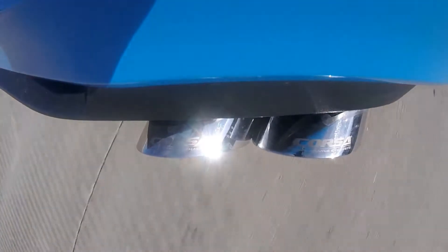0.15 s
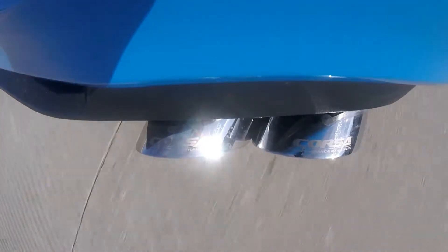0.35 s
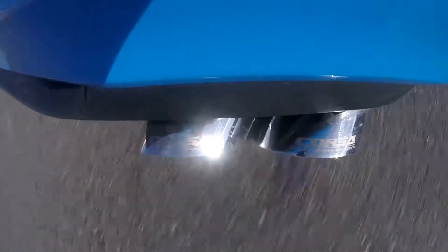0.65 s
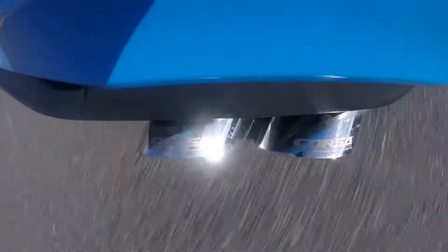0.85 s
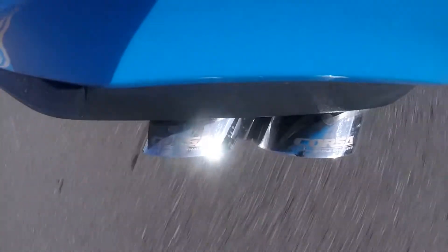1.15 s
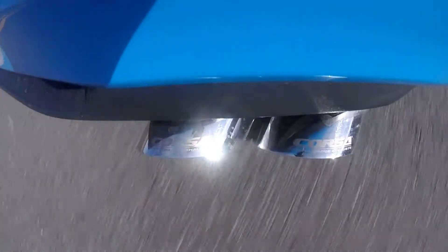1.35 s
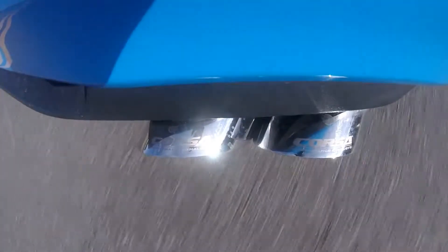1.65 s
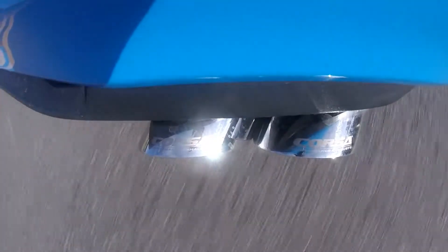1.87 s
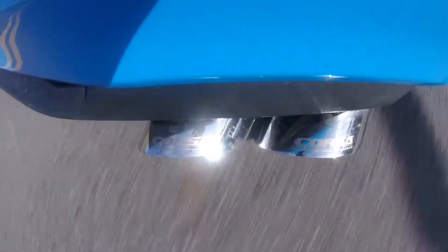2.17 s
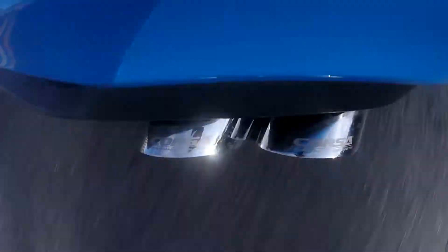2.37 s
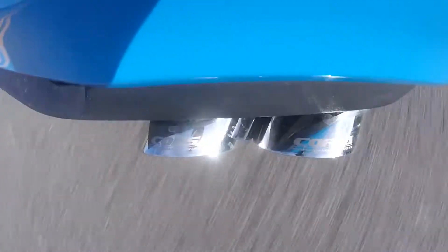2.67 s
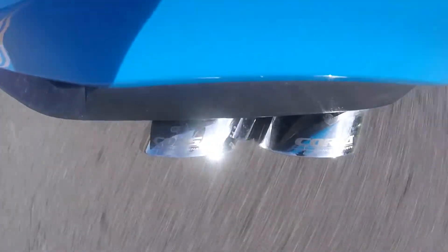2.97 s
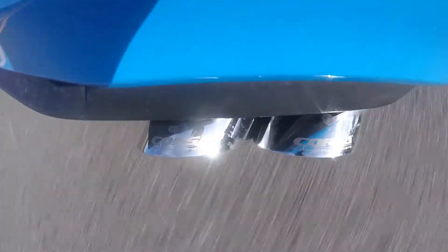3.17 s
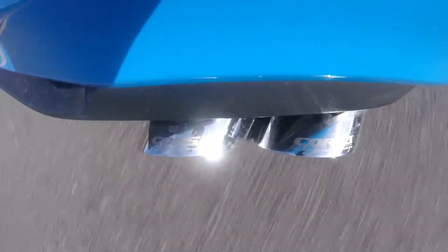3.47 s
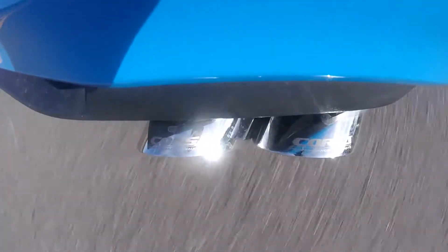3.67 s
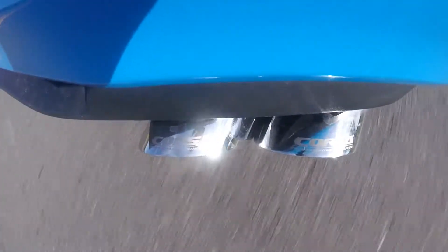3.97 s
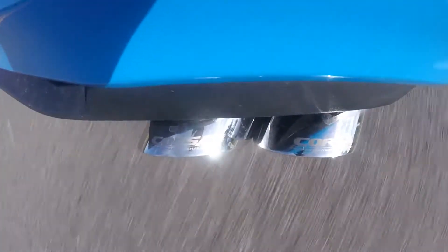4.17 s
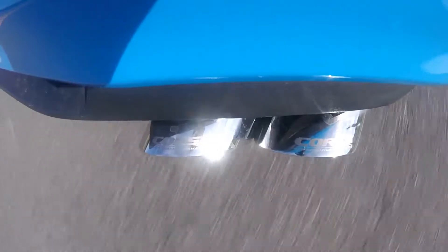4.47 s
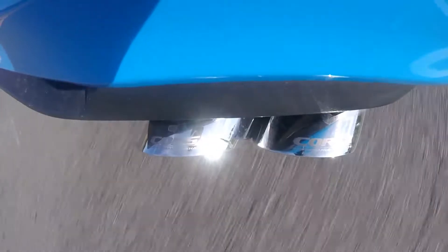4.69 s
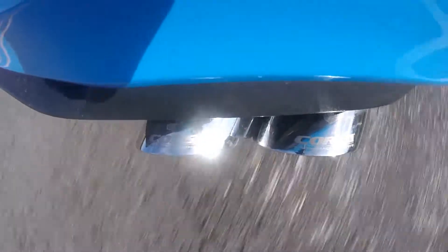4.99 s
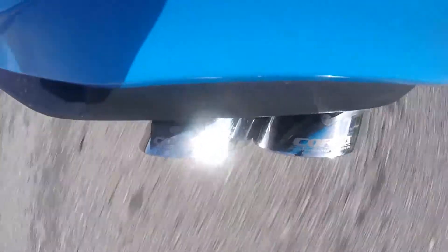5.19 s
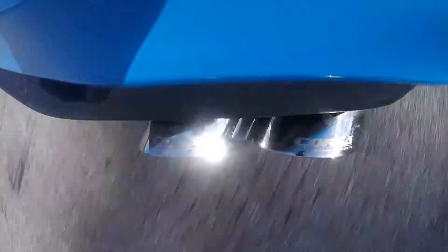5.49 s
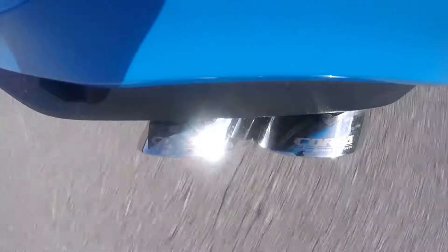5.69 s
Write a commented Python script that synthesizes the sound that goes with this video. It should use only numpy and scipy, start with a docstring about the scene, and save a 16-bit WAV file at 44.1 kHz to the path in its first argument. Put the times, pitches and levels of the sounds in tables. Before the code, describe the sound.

From a microphone on the rear bumper of a moving car, a loud V8 roars at full throttle, then drops in pitch with a barking gear change. The exhaust burbles and pops as the car coasts and picks up again, before settling into a deep, slowly falling drone that ends in a putter. Gusts of wind and softer tyre noise run throughout, with a few faint ticks of grit.

```python
"""A cross-plane V8 heard from just above its tailpipes, where eight uneven puffs a cycle boom and rasp.
It starts at full throttle; near 0.9 s the pedal lifts for an upshift, and the next gear bites with a
shudder. A short flare at 1.7 s gives way to coasting, then to a lumpy pick-up at 2.6 s; through these,
unburnt fuel pops in the pipes. From 3.3 s a steady drone sinks with the revs, easing to a putter at 5 s.
All along, wind buffets the microphone and the tyres rush on the road, now and then throwing up grit."""
import sys
import numpy as np
from scipy import signal
from scipy.fft import rfft, irfft, next_fast_len
from scipy.io import wavfile
from scipy.ndimage import uniform_filter1d, minimum_filter1d, map_coordinates

SR = 44100
rng = np.random.default_rng(int(sys.argv[2]) if len(sys.argv) > 2 else 0)


def to_wav(s):
    """Save 16-bit WAV."""
    ch = np.atleast_2d(s).T  # columns
    pcm = np.round(np.clip(ch, -1, 1) * 32767)  # PCM
    wavfile.write(sys.argv[1], SR, pcm.astype(np.int16))


N = 257544
TIME = np.arange(N) / SR

# rate of the engine cycle, two crank turns and eight firings: (time [s], cycle rate [Hz])
CYCLE_RATE = [(0.0, 36.25), (0.2, 36.72), (0.8, 39.34), (1.12, 36.27), (1.32, 34.31), (1.45, 30.71),
              (2.45, 30.15), (2.7, 29.68), (3.05, 29.54), (3.55, 28.9), (4.8, 26.57), (5.08, 25.68),
              (5.2, 26.04), (5.3, 25.51), (5.84, 25.08)]
# the eight puffs of a cycle as they leave the pipes: (place [eighths of a cycle], size [0-1])
PUFFS_HARD = [(.68, .9), (1.83, .65), (2.72, .9), (3.76, 1), (4.85, .6), (5.85, .35), (6.87, 1), (7.78, .6)]
PUFFS_LIGHT = [(.75, 0.64), (1.78, .55), (2.72, .55), (3.74, 1), (4.75, 1), (5.78, 1), (6.85, 0.44),
               (7.9, 0.93)]
PUFFS_COAST = [(1.05, .55), (1.98, .6), (2.4, .45), (3, .6), (3.85, .65), (4.8, .5), (6.1, .8), (7.4, .5)]
PUFFS_EASE = [(.1, .45), (1.45, .95), (2.45, .2), (3.1, .2), (4.3, .35), (5.5, 1), (6.8, .4), (7.05, .45)]
PUFFS_CRUISE = [(.3, .8), (1.57, .95), (2.65, .5), (3.25, .5), (4.58, .6), (5.65, .95), (6.98, .85),
                (7.3, .55)]
# harmonic spectra of the exhaust: (order [multiple of the cycle rate], relative level [dB])
THROTTLE = [(1, -40), (2, -12), (3, -21), (4, -11.5), (5, -5.5), (6, -13), (7, -10), (8, 0.5), (9, -6),
            (10, -7.5), (11, -22.5), (12, -8.5), (13, -8.5), (14, -14.5), (15, -3), (16, 1.5), (17, -3),
            (18, -2.5), (19, 1.5), (20, -6.5), (21, -1), (22, -19), (23, -3), (24, -13), (25, -11),
            (26, -25.5), (27, -39.5), (28, -11.5)]
FLARE = [(1, -28), (2, -27.5), (3, -31), (4, -39), (5, -6), (6, -8.0), (7, -1), (8, 4), (9, -18), (10, -23),
         (11, -22.5), (12, -17), (13, -20.5), (14, -9.5), (15, -9.5), (16, -5), (17, -29), (18, -13),
         (19, -13), (20, -6.5), (21, -9), (22, -10), (23, -8.5), (24, -2), (25, -33), (26, -17), (27, -29),
         (28, -37), (29, -33), (30, -22.5)]
BURBLE = [(1, -9.5), (2, -16), (3, -8), (4, -14.5), (5, -2), (6, 4.5), (7, -2.5), (8, -0.5), (9, -3),
          (10, -10), (11, -11.5), (12, -10.5), (13, -11), (14, -11.0), (15, -11), (16, -19), (17, -5.5),
          (18, -1), (19, -10), (20, -3.5), (21, -5.5), (22, -18), (23, -16), (24, -11.5), (25, -17.5),
          (26, -23), (27, -24.5), (28, -19.5), (29, -28), (30, -31)]
COAST = [(1, -5.5), (2, -10), (3, -10.5), (4, -23.5), (5, -8), (6, 1), (7, -1), (8, 2), (9, -12.5),
         (10, -7.5), (11, -3), (12, -11), (13, -5.5), (14, -27), (15, -5.5), (16, -15.5), (17, -11.5),
         (18, -12), (19, -9), (20, -8), (21, -11), (22, -6.5), (23, -7), (24, -19.5), (25, -22),
         (26, -24.5), (27, -31), (28, -17), (29, -29.5), (30, -17)]
DRONE = [(1, -38.5), (2, -26), (3, -11), (4, -22), (5, -16.5), (6, 2), (7, -3.5), (8, -1), (9, -16.5),
         (10, -8.5), (11, -14), (12, -19.5), (13, -11), (14, -14.5), (15, -18), (16, -19.5), (17, -26),
         (18, -13), (19, -7.5), (20, -15.5), (21, -13), (22, -22.5), (23, -29), (24, -9.5), (25, -9),
         (26, -8), (27, -40.5), (28, -33.5), (29, -25.5), (30, -23), (31, -18.5), (32, -35), (33, -31.5),
         (34, -21.5), (35, -27), (36, -40), (37, -36.5), (38, -32.5)]
EASE = [(1, -24), (2, -10), (3, -33.5), (4, -15.5), (5, -32), (6, 3), (7, -5), (8, 0), (9, -8.5),
        (10, -4.5), (11, -19.5), (12, -9), (13, -11), (14, -10.5), (15, -25), (16, -10.5), (17, -16),
        (18, -13), (19, -20.5), (20, -9.5), (21, -22), (22, -15.5), (23, -9), (24, -9.5), (25, -9),
        (26, -28), (27, -10.5), (28, -15), (29, -18.5), (30, -15.5), (31, -19.5), (32, -20), (33, -26),
        (34, -25), (35, -36), (36, -35), (37, -24.5), (38, -25.5), (39, -19), (40, -29.5)]
# running states: full throttle, lift, overrun, fuel back, flare, coasting, pick-up, drone, putter
# (start [s], crossfade [s], spectrum [table], puffs [table], boom [dB], bark [dB], rasp [dB],
# roughness [0-1])
STATES = [(-1, .1, THROTTLE, PUFFS_HARD, -20.1, -19.2, -24.7, .06),
          (.88, .13, THROTTLE, PUFFS_HARD, -19.8, -23.3, -32.5, .12),
          (.93, .03, BURBLE, PUFFS_LIGHT, -27, -31, -53, .38),
          (1.56, .06, BURBLE, PUFFS_LIGHT, -15.3, -22.8, -35.2, .42),
          (1.68, .1, FLARE, PUFFS_LIGHT, -18.6, -24, -36, .2),
          (1.95, .12, COAST, PUFFS_COAST, -22, -29.2, -55, .4),
          (2.58, .16, BURBLE, PUFFS_LIGHT, -16.4, -20.6, -36.6, .7),
          (3.25, .1, DRONE, PUFFS_CRUISE, -14.7, -23.5, -40.5, .15),
          (5.04, .27, EASE, PUFFS_EASE, -16, -21.1, -36.3, .07)]
# surges and sags of the gas flow: (peak time [s], fall time [s], boom [dB], bark [dB], rasp [dB])
SURGES = [(.28, .42, .9, 1.7, 1.3), (.96, .06, 0, 0, 13), (1.088, .055, 4.4, 5.8, 22.5),
          (1.3, .1, 4.2, 8.5, 16.5), (1.43, .06, 4, 0, -6), (1.735, .1, -.7, 6.2, 5.5),
          (2.815, .05, 2.3, 2, 4.5), (2.915, .03, -3.5, -6, 1.5), (3.115, .03, 1.8, 0, 3),
          (3.255, .04, -.3, -4.5, -2), (3.4, .52, 0, 2.8, 6.8), (4.92, .08, 2.1, 1, 2),
          (5.19, .05, 1.2, -3.3, -3)]
# spectra of the gas jet at full and at part throttle: (frequency [Hz], relative level [dB])
JET_HARD = [(600, -25), (1000, -4), (1170, -6), (1270, -13.5), (1430, -2), (1720, -7), (2100, -11),
            (2900, -9.5), (4000, -6.5), (4800, -19.5), (6500, -19.5), (7100, -31), (10000, -35.5),
            (11300, -30), (14000, -51.5), (15800, -50)]
JET_SOFT = [(500, -28), (900, -1), (1130, -7), (1300, -2), (1550, -8.5), (1800, -9), (2300, -18.5),
            (2900, -15), (4000, -19), (4900, -36), (6450, -32), (7100, -48.5), (11500, -56), (15800, -66.5)]
# afterfire in the pipes: (time [s], relative level [dB], crack offset [dB])
POPS = [(1.085, -7, -16.5), (1.71, -2, -27.5), (1.715, 4, -40), (1.752, -6.5, -43.5), (1.785, -5, -38.5),
        (2.084, -5, -45), (2.612, -9, -41), (2.818, -2, -31.5), (2.822, -1, -33.5), (2.953, -13, -39),
        (2.985, -14, -30.5), (3.114, -5.5, -36.5), (3.19, -10.5, -29.5), (3.219, 5.5, -40.5)]
# pipe resonances under a pop: (frequency [Hz], bandwidth [Hz], gain [dB])
PIPE_MODES = [(260, 160, 0), (640, 330, 0), (1400, 600, -14)]
# grit striking the bodywork: (time [s], relative level [dB])
GRIT_HITS = [(1.3048, -46), (2.7923, -47), (2.9377, -48), (3.2079, -37), (3.3559, -47.5), (5, -41)]
# gusts on the microphone: (time [s], half width [s], rise [dB])
GUSTS = [(.66, .05, 8), (1.33, .22, 7), (2.5, .06, 7), (3, .4, 11.5), (3.37, .05, 6), (4, .09, 13),
         (4.29, .08, 8), (4.7, .12, 6), (4.94, .05, 13), (5.22, .15, 9)]
# spectra of a grit tick, the wind and the tyres: (frequency [Hz], relative level [dB])
TICK_SPECTRUM = [(800, -20), (2000, -2), (4000, 0), (6500, -6), (7500, -17), (15000, -30)]
WIND_SPECTRUM = [(10, -24), (25, -0.5), (45, -1.5), (70, -2.5), (120, -13.5), (250, -3.5), (600, -46.5),
                 (2000, -80.5)]
TYRE_SPECTRUM = [(60, -0.5), (200, 0.5), (700, -14.5), (1100, -12.5), (2000, -19.5), (4000, -32.5),
                 (5000, -39.5), (6500, -46), (7200, -64.5), (15000, -66)]


def exhaust():
    """Pulsating outflow: a nearly periodic train of puffs radiates a low boom, a mid bark and a rasp."""
    shares, cycle_hz = state_shares(), engine_speed()
    boom_db, bark_db, rasp_db, roughness = engine_load(shares, cycle_hz)
    cycle = np.cumsum(cycle_hz) / SR
    firing = cycle * len(PUFFS_HARD)
    # poor combustion scatters both the timing and the size of the puffs
    cycle = np.maximum.accumulate(cycle + .014 * roughness * wobble(firing))
    strength = amp(4 * roughness * wobble(firing))
    pressure, fronts = np.zeros(N), np.zeros(N)
    for share, (_, _, orders, puffs, *_) in zip(shares, STATES):
        pressure += strength * share * pipe_wave(cycle, orders, puffs)
        fronts += strength * share * steep_fronts(cycle, puffs)
    boom = steady(filtered(pressure, lambda hz: below(hz, 409) * (1 - below(hz, 62, order=4))))
    bark = steady(filtered(pressure, lambda hz: (1 - below(hz, 396)) * below(hz, 1150)))
    # the jet turns bright at full throttle and in any strong surge
    brightness = np.maximum(shares[0], np.clip((rasp_db + 35.5) / 14, 0, 1))
    return amp(boom_db) * boom + amp(bark_db) * bark + amp(rasp_db) * gas_jet(fronts, brightness)


def pipe_wave(cycle, orders, puffs, lead_hz=109, size=2048):
    """Fourier synthesis: the engine orders line up in phase to form a pressure hump for each puff."""
    order, level_db = np.transpose(orders)
    place, strength = np.transpose(puffs)
    # big puffs are the sharpest, so they rule the high orders
    weight = strength ** (1 + order[:, None] / 30)
    humps = np.sum(weight * np.exp(-2j * np.pi * np.outer(order, place) / len(puffs)), axis=1)
    # the open pipe end sucks back after each hump
    mean_cycle_hz = np.mean(CYCLE_RATE, axis=0)[1]
    phase = np.angle(humps) + np.arctan(lead_hz / (order * mean_cycle_hz))
    period = unit(irfft(np.r_[0, amp(level_db) * np.exp(1j * phase)], size))
    return np.interp(cycle % 1, np.arange(size + 1) / size, np.r_[period, period[0]])


def steep_fronts(cycle, puffs, steepening=1.5):
    """Nonlinear steepening: each puff makes a spike that grows faster than the puff's size."""
    place, strength = np.transpose(puffs)
    cycles = np.arange(int(cycle[-1]) + 1)
    due = (cycles[:, None] + place / len(puffs)).ravel()
    arrival = np.interp(due, cycle, np.arange(N), right=N + 1)
    height = np.tile(strength ** steepening, len(cycles))
    # each spike is shared between two neighbouring samples
    sample, late = arrival.astype(int), arrival % 1
    return np.bincount(sample, height * (1 - late), N)[:N] + np.bincount(sample + 1, height * late, N)[:N]


def gas_jet(fronts, brightness, decay_s=.0012):
    """Turbulent jet noise: each front snarls and tears a burst of hiss from the outlet."""
    bursts = unit(signal.lfilter([1], [1, -np.exp(-1 / (decay_s * SR))], fronts))

    def jet(spectrum, edge_hz, hiss_gain, steady_flow):
        snarl = unit(filtered(fronts, lambda hz: below(hz, edge_hz, order=2)))
        hiss = unit((bursts + steady_flow) * rng.standard_normal(N))
        return steady(coloured(snarl + hiss_gain * hiss, spectrum))

    hard = jet(JET_HARD, edge_hz=3600, hiss_gain=1.1, steady_flow=.9)
    soft = jet(JET_SOFT, edge_hz=2000, hiss_gain=1.45, steady_flow=.7)
    return steady(brightness * hard + (1 - brightness) * soft)


def engine_speed(bite_s=1.4, shudder_hz=3.45, swing_hz=1.77, decay_s=.5):
    """Damped oscillation: the driveline shudders as the next gear bites, swinging the cycle rate."""
    age = np.maximum(TIME - bite_s, 0)
    shudder = swing_hz * np.sin(2 * np.pi * shudder_hz * age) * np.exp(-age / decay_s)
    return np.interp(TIME, *np.transpose(CYCLE_RATE)) - shudder


def state_shares():
    """Linear crossfade: the weight of each running state as it gives way to the next."""
    begun = np.array([np.clip((TIME - start) / fade + .5, 0, 1) for start, fade, *_ in STATES])
    return -np.diff(begun, axis=0, append=0)


def engine_load(shares, cycle_hz, resonant_cycle_hz=26.9, half_width_hz=.8):
    """Amplitude modulation: the running state sets levels and roughness; flow surges shift the levels."""
    *held_db, roughness = np.transpose([state[4:] for state in STATES]) @ shares
    surge_db = sum(np.outer(rise_db, swell(s, fall / 2, fall)) for s, fall, *rise_db in SURGES)
    boom_db, bark_db, rasp_db = held_db + surge_db
    # the boom swells as the sinking revs cross a pipe resonance
    resonance_db = 1.25 * np.exp(-((cycle_hz - resonant_cycle_hz) / half_width_hz) ** 2)
    drift_db = .75 * wobble(TIME * 13)
    return boom_db + resonance_db, bark_db + drift_db, rasp_db + drift_db, roughness


def afterfire():
    """Impulse excitation: unburnt fuel goes off with a short crack and rings the pipe resonances."""
    impulses, cracks = np.zeros(N), np.zeros(N)
    for s, level_db, crack_db in POPS:
        impulses[round(s * SR)] = amp(level_db + 16)
        add_burst(cracks, s, level_db + crack_db, t60_s=.021)

    def pipe_response(hz):
        modes = sum(amp(db) * 1j * hz * width / (centre ** 2 - hz ** 2 + 1j * hz * width)
                    for centre, width, db in PIPE_MODES)
        return modes * below(hz, 1600, order=4)

    return filtered(impulses, pipe_response) + amp(6.5) * coloured(cracks, JET_HARD)


def grit():
    """Impact noise: small stones thrown up by the tyres tick on the bodywork."""
    ticks = np.zeros(N)
    for s, level_db in GRIT_HITS:
        add_burst(ticks, s, level_db, t60_s=.012)
    return amp(9.5) * coloured(ticks, TICK_SPECTRUM)


def wind(lull_db=-37):
    """Turbulent pressure fluctuation: eddies strike the microphone, harder in gusts."""
    gust_db = sum(rise_db * swell(s, half_s, half_s) for s, half_s, rise_db in GUSTS)
    return amp(lull_db + gust_db + 2.2 * wobble(TIME * 12)) * noise(WIND_SPECTRUM)


def tyres(level_db=-37):
    """Rolling noise: the tyres on the road make a nearly even broadband rush."""
    return amp(level_db + wobble(TIME * 4)) * noise(TYRE_SPECTRUM)


def add_burst(track, start_s, level_db, t60_s):
    """Exponential decay: adds to the track a noise burst that falls 60 dB in t60_s."""
    age = np.arange(SR // 20) / SR
    burst = amp(level_db - 60 * age / t60_s) * rng.standard_normal(len(age))
    track[round(start_s * SR):][:len(age)] += burst


def swell(peak_s, rise_s, fall_s):
    """Gaussian envelope: a smooth rise to 1 at peak_s and back."""
    return np.exp(-((TIME - peak_s) / np.where(TIME < peak_s, rise_s, fall_s)) ** 2)


def wobble(knots):
    """Spline interpolation: a smooth random curve with a new value at each whole number of knots."""
    return map_coordinates(rng.standard_normal(4096), [knots], mode="wrap")


def noise(spectrum):
    """Spectral shaping: white noise coloured and scaled to rms 1."""
    return unit(coloured(rng.standard_normal(N), spectrum))


def coloured(x, spectrum):
    """Minimum-phase filtering: folding the cepstrum gives a causal filter with the given spectrum."""
    size = 2 * next_fast_len(N // 2 + SR // 4)
    hz, db = np.transpose(spectrum)
    gain_db = np.interp(np.log(np.fft.rfftfreq(size, 1 / SR) + 1), np.log(hz), db)
    cepstrum = irfft(np.log(amp(gain_db)))
    cepstrum[1:size // 2] *= 2
    cepstrum[size // 2 + 1:] = 0
    return irfft(rfft(x, size) * np.exp(rfft(cepstrum)), size)[:N]


def filtered(x, response):
    """Convolution theorem: the spectrum of x is multiplied by a frequency response."""
    size = next_fast_len(N + SR // 2)
    return irfft(rfft(x, size) * response(np.fft.rfftfreq(size, 1 / SR)), size)[:N]


def below(hz, edge_hz, order=8):
    """Low-pass response: the gain is one half at edge_hz."""
    return 1 / (1 + (hz / edge_hz) ** order)


def steady(x, window=3500):
    """Running normalisation: x held at rms 1, its fast pulsing kept."""
    power = uniform_filter1d(uniform_filter1d(x ** 2, window), window)
    return x / np.sqrt(np.abs(power) + 1e-12)


def unit(x):
    """Normalisation: x at rms 1."""
    return x / np.sqrt(np.mean(x ** 2) + 1e-20)


def amp(db):
    """Decibel scale: level to amplitude ratio."""
    return 10 ** (np.asarray(db) / 20)


def scene():
    """Superposition: all sources add at one point on the rear bumper."""
    return (exhaust() + afterfire() + grit() + wind() + tyres())[None]


def record(dry, ceiling=.92, top_hz=15800):
    """Peak and band limiting: the gain dips at the highest peaks, and nothing above top_hz passes."""
    needed = np.minimum(1, ceiling / (np.abs(dry[0]) + 1e-9))
    held = minimum_filter1d(needed, size=200)
    gain = uniform_filter1d(uniform_filter1d(held, size=100), size=100)
    return filtered(dry[0] * gain, lambda hz: hz < top_hz)[None]


dry = scene()
out = record(dry)
to_wav(out)
```